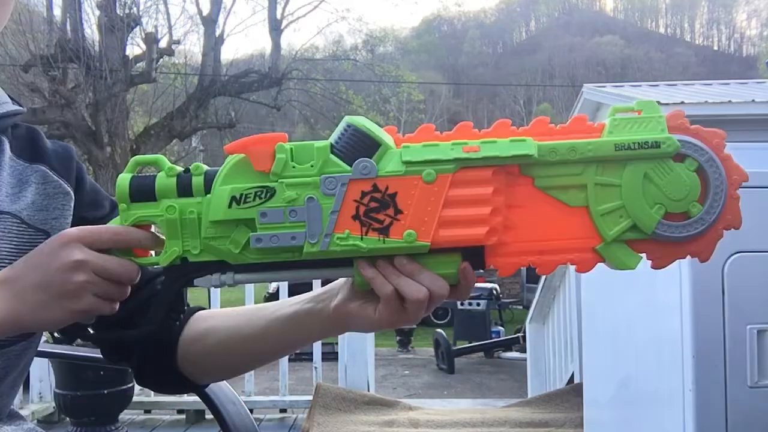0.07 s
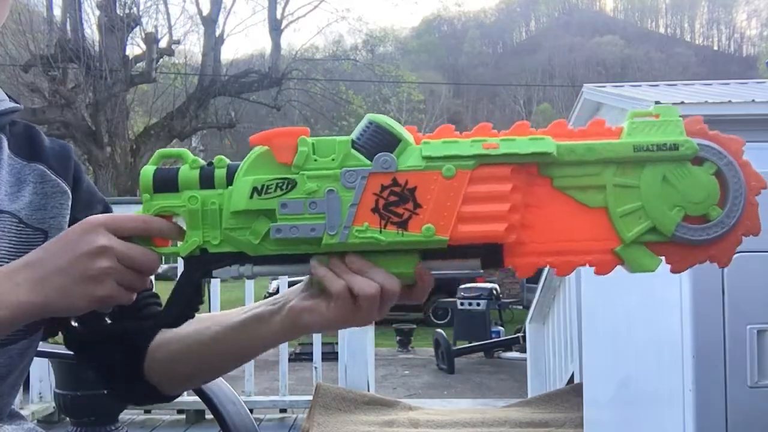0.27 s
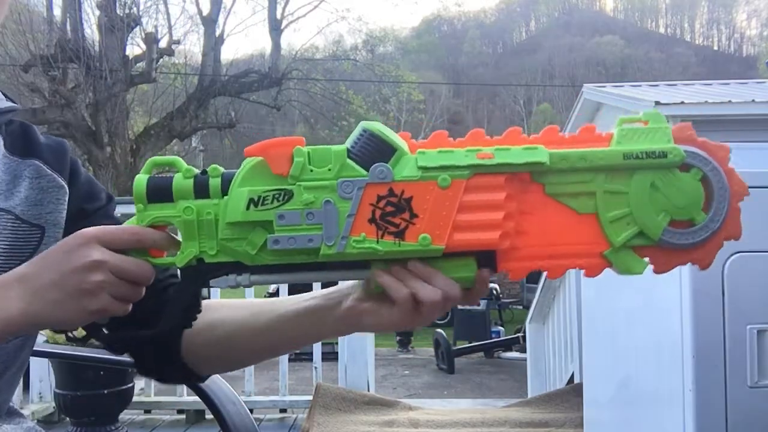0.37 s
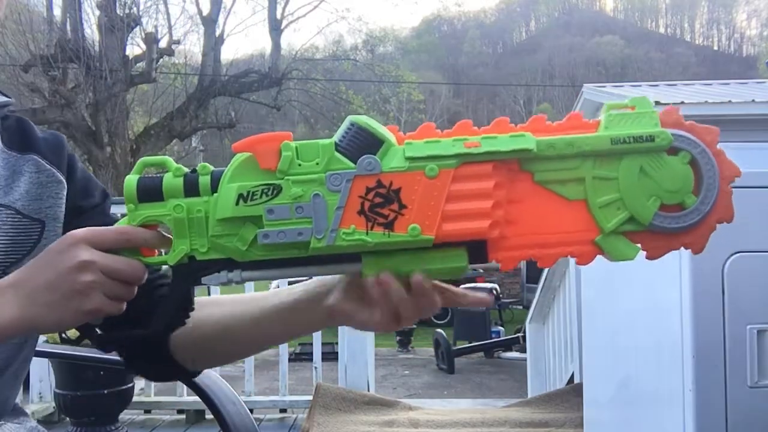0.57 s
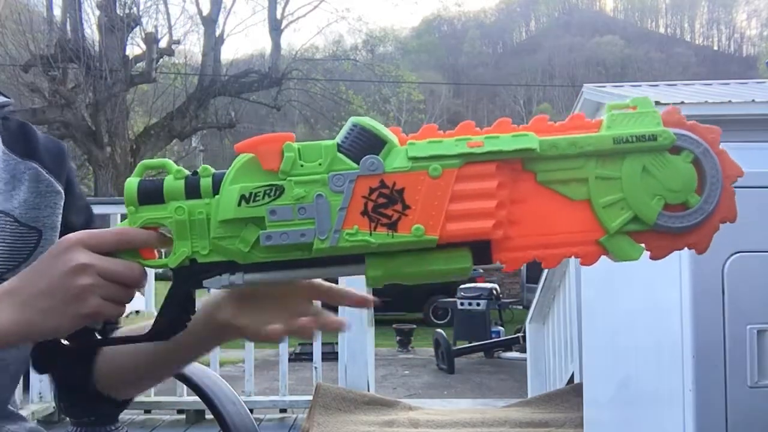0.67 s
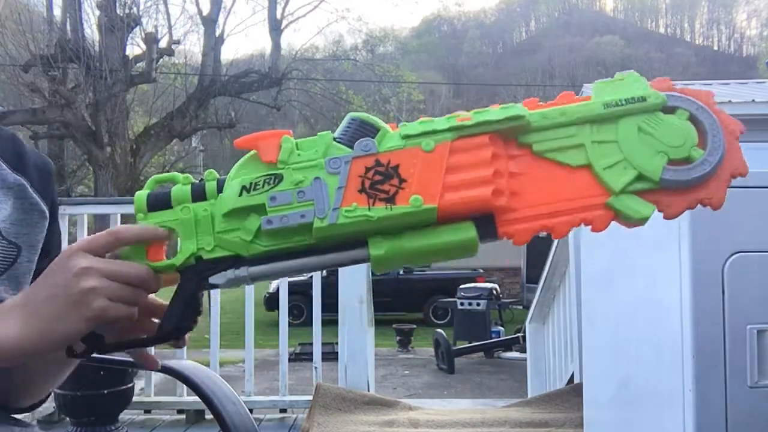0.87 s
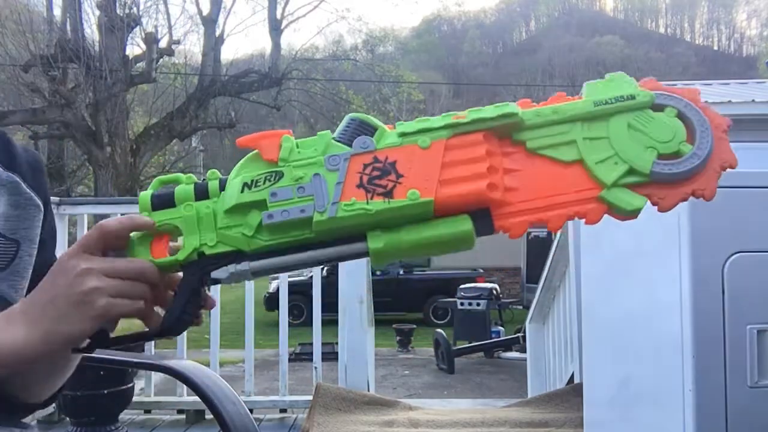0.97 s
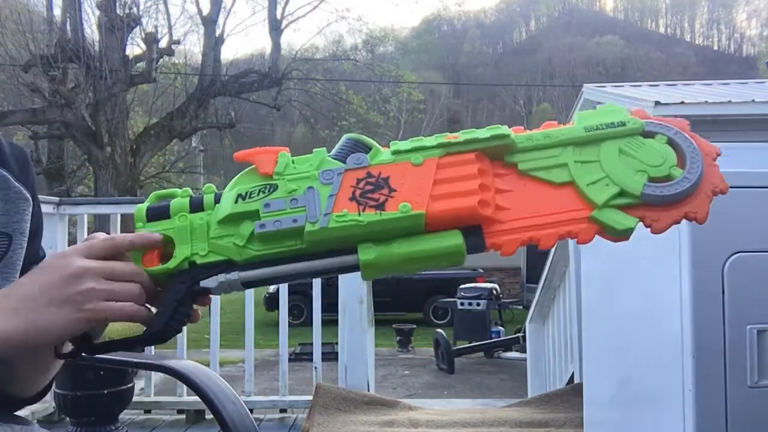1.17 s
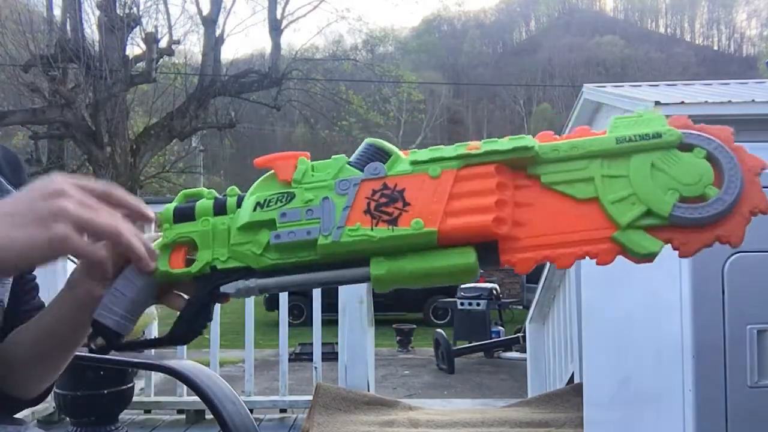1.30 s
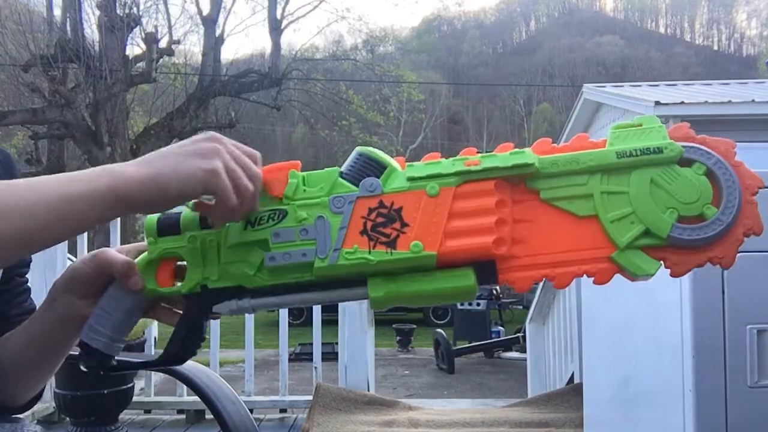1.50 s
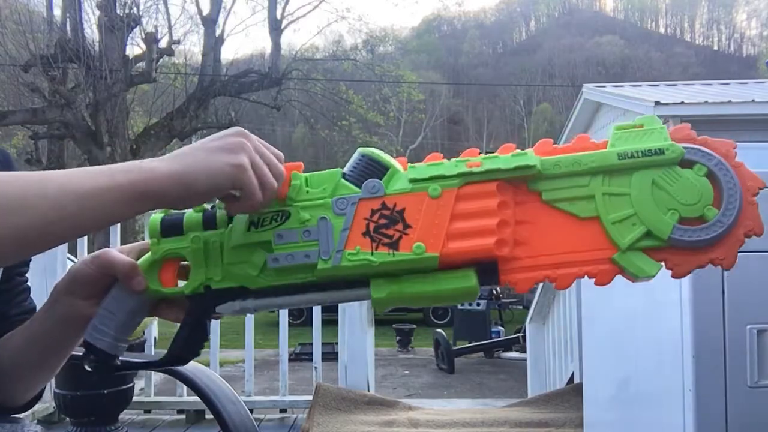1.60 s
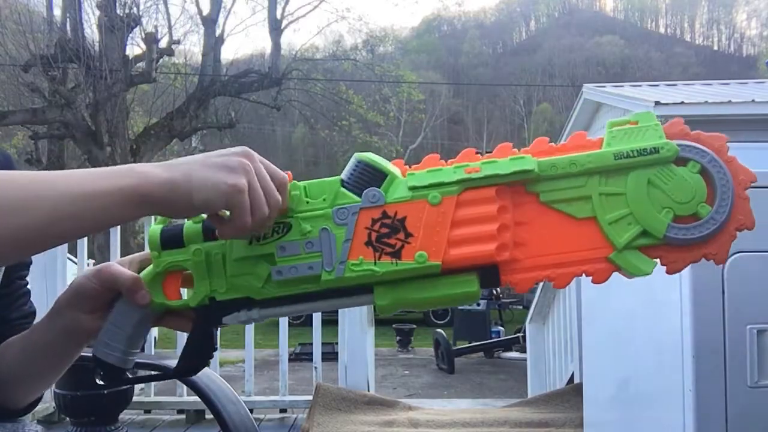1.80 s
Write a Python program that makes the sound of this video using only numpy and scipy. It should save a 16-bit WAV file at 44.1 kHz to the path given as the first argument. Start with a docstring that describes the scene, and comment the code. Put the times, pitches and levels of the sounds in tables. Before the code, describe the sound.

A plastic toy blaster is pumped with two sharp clacks, then handled with faint clicks.

```python
"""A plastic toy blaster, pumped back and pushed home close to the microphone on an outdoor deck.
Each stroke scrapes, trips over catches and ends in a hard clack that rings the hollow shell.
Fingers then tick and rub on the plastic; deck and wall throw back short reflections.
Far off, an engine hums and faint tones waver in the quiet outdoor air."""
import sys
import numpy as np
from scipy import signal
from scipy.fft import rfft, irfft, next_fast_len
from scipy.io import wavfile
from scipy.ndimage import uniform_filter1d

SR = 44100
rng = np.random.default_rng(int(sys.argv[2]) if len(sys.argv) > 2 else 0)


def file_out(sig):
    """Save sig as 16-bit WAV at sys.argv[1]."""
    # one column per channel
    cols = np.atleast_2d(sig).T
    # limit, then scale
    lim = np.clip(cols, -1, 1)
    pcm = np.round(lim * 32767).astype(np.int16)
    wavfile.write(sys.argv[1], SR, pcm)


N = 81585
T = np.arange(N) / SR
RING_T = np.arange(SR // 4) / SR

# Knocks of the mechanism: t/s, level/dB, thump/dB, bite/dB, treble/dB
KNOCKS = [(0.2138, -19, 10, -6, -10), (0.2418, -15.5, -3, 6, 1), (0.2440, -16, -7, 12.5, 6),
          (.2470, -6, 2, -18, -1), (0.2547, -6.5, 7, -3, -8), (0.2577, -7.5, 5.5, -4, -5),
          (0.274, -8.5, 0.5, 1, -3), (0.2750, -7, 9, -8, 1), (0.2838, -4, 2, 8, 5), (0.2854, -6, 7, 0, 1.5),
          (0.2948, -19, 11, -12, 7), (0.301, -14.5, -1, 1, 5.5), (0.3023, -15.5, 8.5, -3, -12),
          (0.3841, -19, 17.5, 5.5, -2.5), (0.4229, -21.5, 12, 5, -1), (.4468, -8, -10, -6, -1),
          (0.449, -16.5, 13.5, 13, 12.5), (0.455, -20.5, 19.5, 9, 3), (0.4572, -15.5, 10, -5, -7),
          (0.4645, -3, -11, 2, -4), (0.4677, 0, -9, -0.5, -7), (0.4746, 6, 0, -2, 0.5)]
# Sliding of the pump: t/s, level/dB
SLIDE_LEVELS = [(.205, -67), (.216, -54), (.232, -53.5), (.244, -31.5), (.268, -40.5), (.298, -43.5),
                (.315, -49.5), (.335, -62), (.365, -66), (.385, -67), (.405, -61), (.420, -66),
                (.443, -44.5), (.450, -42), (.478, -31), (.500, -53.5), (.520, -73)]
# Corners of a contact's thump, bite and treble: f/Hz
COLOUR_HZ = [700, 1200, 2200, 3000, 3800, 5500]
# Shell modes: f/Hz
MODE_HZ = [1322, 1530, 1679, 1823, 1920, 2016, 2118, 2280, 2390, 2555, 2890, 3030, 3172, 3360, 3650, 4250,
           5600]
# Their ring, in the same order: t60/s before the pump damps it, pull level/dB, push level/dB
MODE_RINGS = [(0.033, -10.5, -11), (0.024, -24, -10.5), (0.056, -14, -7.5), (0.041, -19, -10.5),
              (0.061, -13.5, -7), (0.04, -11, -10.5), (0.05, -21, -13), (0.02, -27, -9), (0.045, -30, -16),
              (0.04, -24, -13), (0.054, -22, -29), (0.012, -13, -30), (0.034, -14, -14), (0.026, -30, -12),
              (.022, -30, -18.5), (0.019, -16.5, -33), (0.017, -18, -14.5)]
# Dense clatter of the shell: band centre f/Hz, level/dB, t60/s, rise/s
CLATTER_BANDS = [(299.3, -14, 0.033, 0.0015), (495, -22.5, 0.15, 0.0014), (727, -20.5, 0.049, 0.0017),
                 (1095, -23, 0.11, 0.0011), (1300, -7, 0.032, 0.00081), (2034, -3, 0.017, 0.00012),
                 (3150, -7, 0.024, 0.00029), (4300, -17.5, .016, 0.00054), (5040, -24, 0.021, 0.00071),
                 (6010, -15, 0.017, 0.00046), (8880, -21.5, 0.023, 0.00042), (10850, -29.5, .017, .0005),
                 (11470, -22.5, 0.012, .0005), (14800, -24, .017, .0005)]
# End stops of the pump: t/s, thud level/dB, snap f/Hz, snap level/dB
END_STOPS = [(0.2845, -6, 3076, 3.05), (0.4758, -2.5, 2320, 2.8)]
# Hollow body of the blaster: f/Hz, t60/s, level/dB
CAVITY_MODES = [(248, 0.1, -15), (293, 0.027, -1.5), (339, 0.06, -9.5), (724, 0.03, -8.5)]
# Finger ticks: t/s, level/dB, thump/dB, bite/dB, treble/dB, touched panel f/Hz
FINGER_TICKS = [(0.716, -30, -8, 2, 0, 1900), (0.9408, -21, 3.5, -4, -8, 1270),
                (1.0133, -28.5, -9, -5, -14, 1860), (1.032, -27, -3, 3.5, -15, 1330),
                (1.067, -28, 3, 0.5, -1, 2000), (1.1106, -27.5, 2, -6, -5, 1480),
                (1.552, -22, -1, -2, -7, 1325), (1.5688, -22, -0.5, -1, 1.5, 1300),
                (1.6190, -29.5, 2, 2, 0, 2630)]
# Ring of a tick: band centre f/Hz, level/dB, t60/s, rise/s
TICK_BANDS = [(386, -7.5, 0.051, 0.0016), (674, -7.5, 0.06, 0.00077), (1260, -6.5, 0.047, 0.00076),
              (2000, -3.5, 0.043, 0.00049), (3400, -9, 0.033, 0.00042), (5500, -15, 0.016, 0.00023),
              (13000, -21, .015, .0003)]
# Rubbing of hands and sleeve: t/s, level/dB
RUB_LEVELS = [(0, -65.5), (.05, -69), (.12, -73), (.62, -76), (.70, -74), (.78, -80), (.87, -69),
              (.98, -75.5), (1.07, -68), (1.16, -75), (1.25, -85), (1.295, -63), (1.308, -70),
              (1.323, -57.5), (1.35, -74), (1.45, -93)]
# Spectrum of the rubbing: f/Hz, relative level/dB
RUB_SPECTRUM = [(500, -8), (1700, 9), (3000, 10.5), (3900, 8), (4800, 5), (7000, -1.5), (15000, -8.5)]
# Reflections from deck and wall: band centre f/Hz, level/dB, t60/s, rise/s
DECK_BANDS = [(494, -26.5, 0.21, 0.011), (1910, -30.5, 0.18, 0.00094), (4560, -18.5, .12, 0.0016),
              (11400, -19.5, 0.12, 0.0032)]
# Distant engine hum: multiple of the cycle rate, level/dB
ENGINE_ORDERS = [(3, -64), (4, -59), (5, -58), (6, -66.5), (7, -62.5), (8, -65), (9, -52.5), (10, -62),
                 (11, -64.5), (12, -67)]
# Faint distant tones: f/Hz, level/dB
WHINE_TONES = [(580, -76), (662, -70), (1262, -71.5), (1890, -69), (2525, -71)]
# Outdoor air: f/Hz, relative level/dB
AIR_SPECTRUM = [(25, -9), (60, 7), (130, 3), (180, 0.5), (270, 2), (330, 4.5), (420, -6), (660, -6),
                (950, -2.5), (1250, -4.5), (1900, -1.5), (2150, -6), (2550, -4), (2950, -9.5),
                (3600, -13.5), (4500, -20), (5000, -28.5), (5950, -22), (8000, -36), (15800, -42.5)]

TURN_S = .36  # the pull ends, the push begins
RING_SHARE = (0.61, 0.92)  # share of the modes' t60 left on the pull and on the push
THUD_RISE_S, SNAP_RISE_S = 0.0039, 0.00058


def pump():
    """Close up: scraping and knocks ring the shell on the pull (stroke 0) and the push (stroke 1)."""
    out = np.zeros(N)
    slips = coloured(grains(per_s=1600, spread_db=4.5), thump_db=3, bite_db=4, treble_db=3)
    scrape = slips * amp(np.interp(T, *np.transpose(SLIDE_LEVELS), left=-np.inf, right=-np.inf))
    for stroke in range(2):
        out += signal.fftconvolve(scrape * ((T > TURN_S) == stroke), shell(stroke))[:N]
    for s, db, *colour in KNOCKS:
        add(out, s, amp(db) * coloured(shell(int(s > TURN_S)), *colour))
    return out


def shell(stroke):
    """The shell's answer to a click; the pump's position weights and damps the modes."""
    modes = 0
    for k, (hz, (t60, *stroke_db)) in enumerate(zip(MODE_HZ, MODE_RINGS)):
        tone = np.sin(2 * np.pi * hz * RING_T) * decay(t60 * RING_SHARE[stroke])
        modes += (-1) ** k * amp(stroke_db[stroke]) * unit_energy(tone)
    clatter = ring(CLATTER_BANDS)
    power = abs(rfft(modes)) ** 2 + abs(rfft(clatter)) ** 2
    return amp(-1) * levelled(modes + clatter, power)


def end_stops():
    """Each end stop snaps sharply and gives the hollow body a short low knock."""
    body = sum(amp(db) * mode(hz, t60, THUD_RISE_S) for hz, t60, db in CAVITY_MODES)
    out = np.zeros(N)
    for s, thud_db, snap_hz, snap_db in END_STOPS:
        snap = mode(snap_hz, t60=0.0098, rise=SNAP_RISE_S)
        add(out, s, amp(thud_db) * body + amp(snap_db) * snap)
    return out


def hands():
    """Hands and sleeve rub near the microphone; each finger tick rings the panel it lands on."""
    rub = unit_rms(shaped(grains(per_s=2500, spread_db=3), RUB_SPECTRUM))
    out = rub * amp(np.interp(T, *np.transpose(RUB_LEVELS)))
    for s, db, *colour, panel_hz in FINGER_TICKS:
        panel = amp(-2.5) * mode(panel_hz, t60=.026, rise=SNAP_RISE_S)
        add(out, s, amp(db) * (coloured(ring(TICK_BANDS), *colour) + panel))
    return out


def scuff(at_s=1.323, fade_s=.008, hz=3800, width_hz=370, db=-63):
    """A finger scuffs the plastic with a brief squeaky hiss."""
    hiss = signal.lfilter(*signal.iirpeak(hz, hz / width_hz, fs=SR), rng.standard_normal(N))
    return amp(db) * unit_rms(hiss) * np.exp(-((T - at_s) / fade_s) ** 2)


def deck_reflections(near):
    """Deck and wall return the close sounds to the microphone as a short tail."""
    return signal.fftconvolve(near, ring(DECK_BANDS))[:N]


def engine(cycle_hz=28.68, waver=0.0032):
    """A distant engine; odd and even orders lie a quarter turn apart, so it throbs twice a cycle."""
    drift = sum(np.sin(2 * np.pi * (hz * T + rng.random())) / np.sqrt(hz)
                for hz in np.geomspace(.4, 6, 20))
    turns = np.cumsum(cycle_hz * (1 + waver * unit_rms(drift))) / SR
    return sum(amp(db) * np.sqrt(2) * np.cos(2 * np.pi * order * turns + np.pi / 2 * (order % 2))
               for order, db in ENGINE_ORDERS)


def whines(half_width_hz=10.8):
    """Faint tones far off: very narrow bands of noise that come and go."""
    hz = np.fft.rfftfreq(N, 1 / SR)
    noise = rfft(rng.standard_normal(N))
    return sum(amp(db) * unit_rms(irfft(noise / (1 + ((hz - centre) / half_width_hz) ** 2), N))
               for centre, db in WHINE_TONES)


def air(db=-54.5):
    """The steady outdoor wash around the deck."""
    return amp(db) * unit_rms(shaped(rng.standard_normal(N), AIR_SPECTRUM))


def grains(per_s, spread_db):
    """Tiny slips of uneven size at random moments."""
    size = amp(spread_db * np.minimum(rng.exponential(1, N), 3))
    return unit_rms(size * rng.choice([-1, 1], N) * (rng.random(N) < per_s / SR))


def mode(hz, t60, rise):
    """One resonance that swells and dies, energy 1."""
    return unit_energy(np.sin(2 * np.pi * hz * RING_T) * (1 - np.exp(-RING_T / rise)) * decay(t60))


def ring(bands):
    """Many overlapping resonances: each band swells and dies at its own speed."""
    hz = np.fft.rfftfreq(len(RING_T), 1 / SR)
    log_hz, log_centres = np.log(hz + 1), np.log([band[0] for band in bands])
    noise = np.exp(2j * np.pi * rng.random(len(hz)))
    out, density_db = 0, []
    for pick, (_, db, t60, rise) in zip(np.eye(len(bands)), bands):
        inside = np.interp(log_hz, log_centres, pick) > .5  # frequencies nearest this centre
        band = irfft(noise * inside, len(RING_T)) * (1 - np.exp(-RING_T / rise)) * decay(t60)
        out += amp(db) * unit_energy(band)
        density_db.append(db - 10 * np.log10(inside.mean()))
    return levelled(out, amp(np.interp(log_hz, log_centres, density_db)) ** 2)


def levelled(x, power):
    """Sets a ring's broad spectrum to the given power and ends it at 0.2 s."""
    spectrum = rfft(x)
    want, have = (uniform_filter1d(uniform_filter1d(p, 21), 21) for p in (power, abs(spectrum) ** 2))
    gain = np.sqrt(abs(want) / (abs(have) + 1e-12))
    return irfft(spectrum * gain, len(x)) * (RING_T < .2)


def coloured(x, thump_db, bite_db, treble_db):
    """The place and hardness of a contact weight the bass, the bite near 3 kHz and the treble."""
    return shaped(x, list(zip(COLOUR_HZ, [thump_db, 0, 0, bite_db, bite_db, treble_db])))


def shaped(x, points):
    """Causal filter through points of f/Hz, level/dB."""
    size = next_fast_len(len(x) + 2048)
    hz, db = np.transpose(points)
    log_hz = np.log(abs(np.fft.fftfreq(size, 1 / SR)) + 1)
    log_gain = np.log(amp(np.interp(log_hz, np.log(hz), db)))
    minimum_phase = np.exp(np.conj(signal.hilbert(log_gain)))
    return np.fft.ifft(np.fft.fft(x, size) * minimum_phase).real[:len(x)]


def decay(t60):
    """Falls by 60 dB in t60 seconds."""
    return np.exp(-np.log(1000) * RING_T / t60)


def amp(db):
    """Decibels to gain."""
    return 10 ** (np.asarray(db) / 20)


def unit_rms(x):
    """Scales to rms 1."""
    return x / np.sqrt(np.mean(x ** 2) + 1e-20)


def unit_energy(x):
    """Scales to energy 1."""
    return x / (np.linalg.norm(x) + 1e-20)


def add(mix, s, sound):
    """Mixes a sound in at time s."""
    part = mix[max(round(s * SR), 0):][:len(sound)]
    part += sound[:len(part)]


def scene(bass_cut_hz=234):
    """At one microphone: the close blaster, too small for deep bass, its reflections, the distance."""
    bass_cut = signal.butter(4, bass_cut_hz, "high", fs=SR, output="sos")
    near = signal.sosfilt(bass_cut, pump() + end_stops() + hands() + scuff())
    return (near + deck_reflections(near) + engine() + whines() + air())[None]


def record(dry, edge_hz=15900):
    """The recorder's band limit."""
    lowpass = signal.firwin(511, edge_hz, window=("kaiser", 9), fs=SR)
    return signal.oaconvolve(dry, lowpass[None], "same")


dry = scene()
out = record(dry)
file_out(out)
```